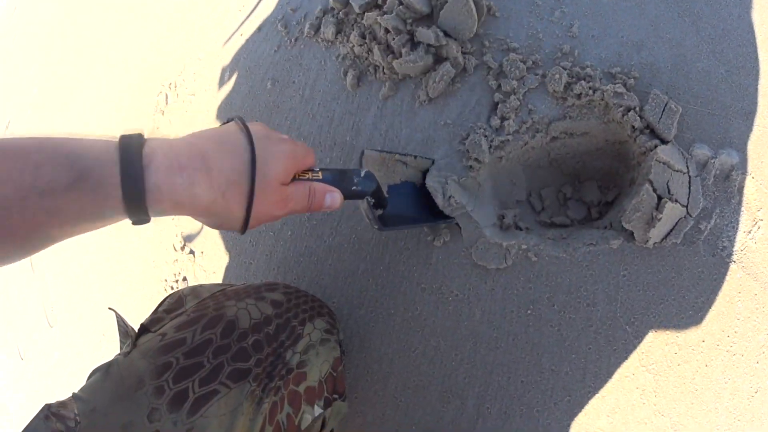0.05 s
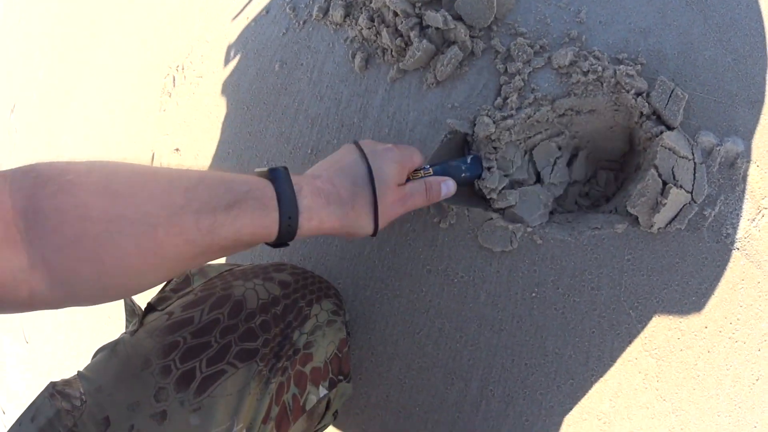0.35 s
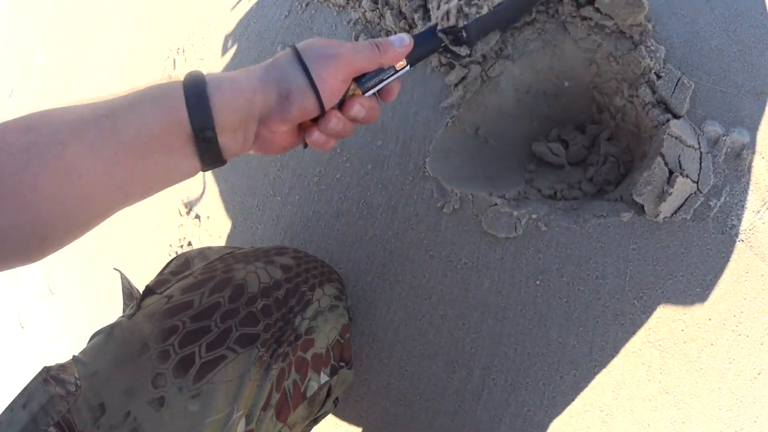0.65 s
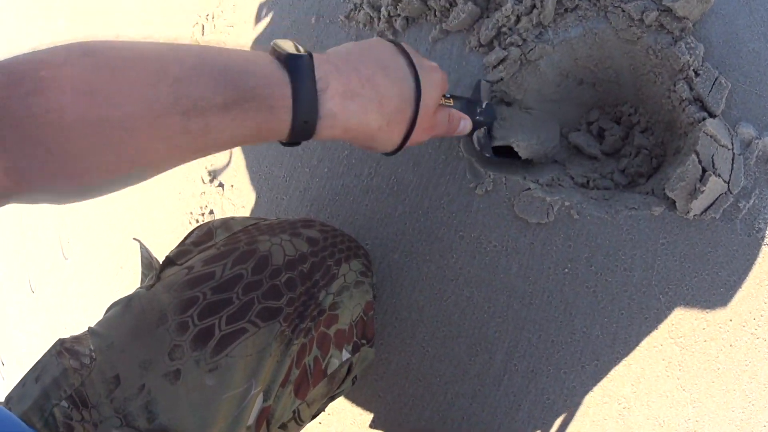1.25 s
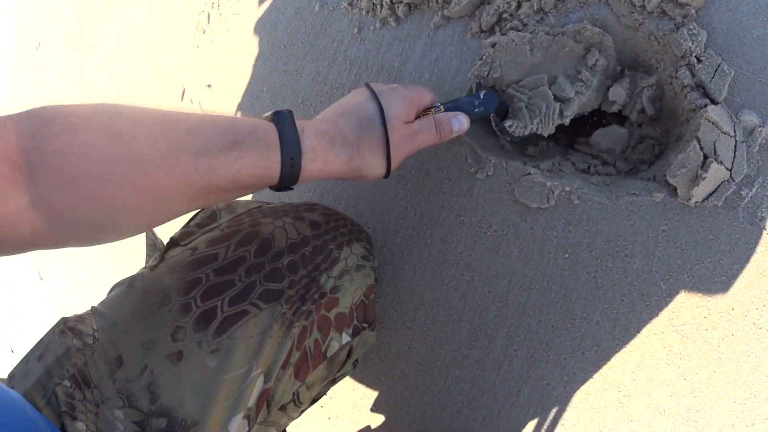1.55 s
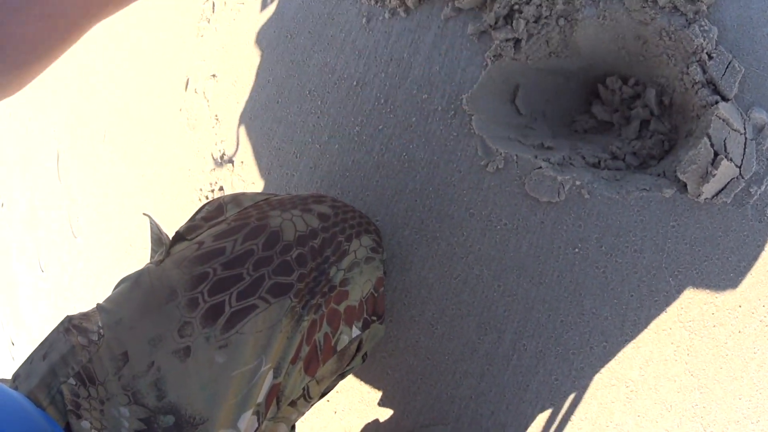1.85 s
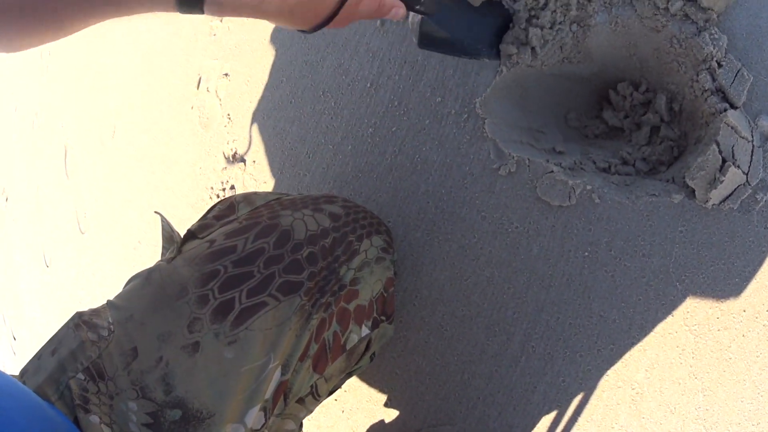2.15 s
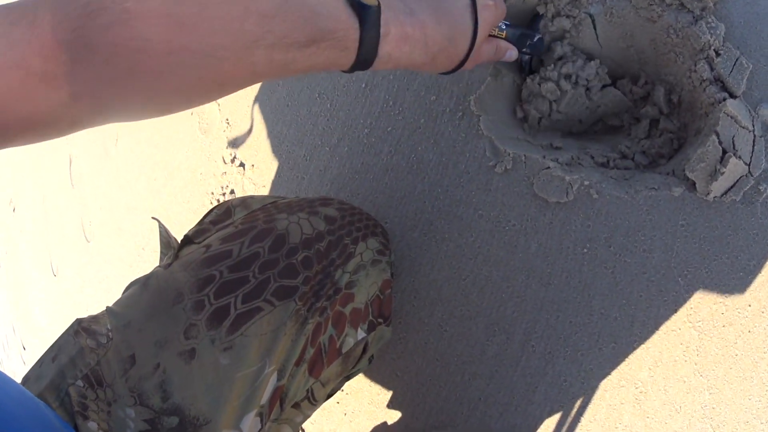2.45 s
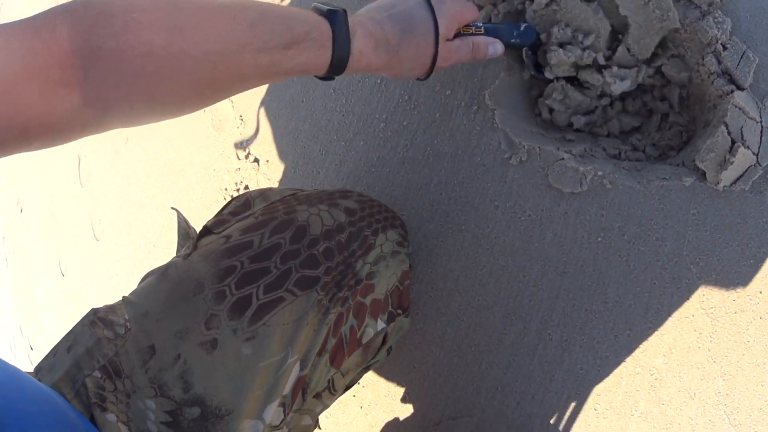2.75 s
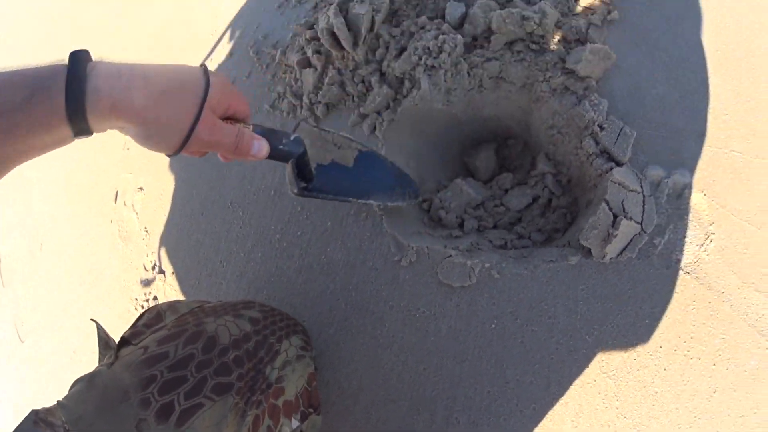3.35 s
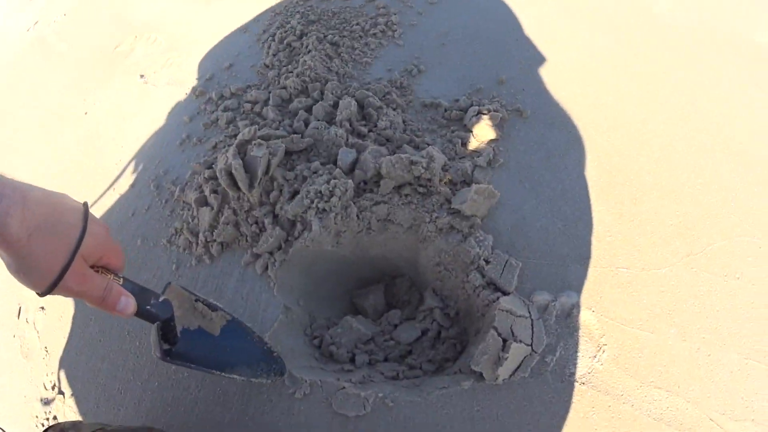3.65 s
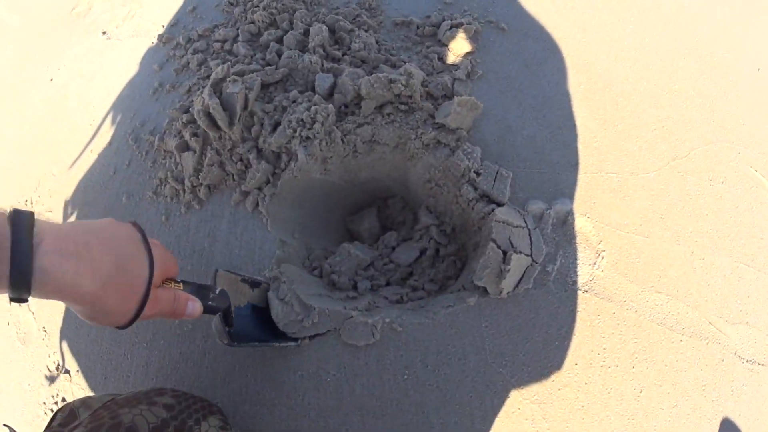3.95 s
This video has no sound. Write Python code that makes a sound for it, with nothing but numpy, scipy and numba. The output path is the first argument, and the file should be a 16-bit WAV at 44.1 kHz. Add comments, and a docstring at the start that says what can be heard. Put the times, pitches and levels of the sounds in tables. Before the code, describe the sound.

Gritty, hissing trowel strokes dig into damp beach sand under gusts of rumbling wind.

```python
"""On a beach, a hand trowel cuts four times into damp sand: grains hiss and rasp along the blade.
Between strokes, loose sand spills and the blade ticks on grit and rings faintly.
Wind buffets the two microphone ports in short puffs, brighter the harder it blows, over faint surf.
A limiter ducks everything under the hardest puffs."""
import sys
import numpy as np
from scipy import signal
from scipy.fft import rfft, irfft
from scipy.io import wavfile
from scipy.ndimage import uniform_filter1d, map_coordinates
from numba import njit

SR = 44100
rng = np.random.default_rng(int(sys.argv[2]) if len(sys.argv) > 2 else 0)


def output_pcm(signal):
    """Save a mono or channel-first signal as 16-bit PCM at the path in sys.argv[1].

    Samples are clipped to [-1, 1] before scaling.
    """
    pcm = np.clip(np.atleast_2d(signal).T, -1, 1) * 32767
    wavfile.write(sys.argv[1], SR, np.round(pcm).astype(np.int16))


N = 176400
T = np.arange(N) / SR

# One list per trowel stroke. Each row: time in seconds, relative hiss and rasp levels in dB.
STROKES = [
    [(.008, -43, -54), (.045, -37.5, -47.5), (.09, -26, -37), (.18, -30.5, -33.5), (.21, -34, -38.5),
     (.285, -40.5, -44.5), (.33, -61, -59)],
    [(1.01, -49, -48), (1.085, -44.5, -55), (1.16, -31, -40.5), (1.235, -23.5, -28), (1.265, -28, -32.5),
     (1.308, -26, -30), (1.323, -37, -39), (1.38, -40, -36.5), (1.445, -54.5, -50)],
    [(2.157, -41.5, -41), (2.19, -35.5, -41), (2.25, -28.5, -29), (2.375, -24, -31), (2.405, -38, -37),
     (2.465, -46, -43), (2.49, -57.5, -55)],
    [(3.857, -33, -39), (3.92, -33.5, -42), (3.97, -33, -36.5), (4.0, -35, -33.5)],
]
# Sand spectra: fine sliding, coarse sliding, loose. Each row: frequency in Hz, relative density in dB.
HISS_SPECTRUM = [(4500, -41), (7000, -13), (8200, -2), (9000, -2.5), (10000, 2), (11000, -4), (11900, -10),
                 (13400, 1), (15800, -3)]
RASP_SPECTRUM = [(1000, -8), (1600, 3.5), (3300, 7), (4300, 2), (6800, -0.5), (9000, 1.5), (16000, -8.5)]
LOOSE_SPECTRUM = [(500, -33), (1400, -3), (3200, 6.5), (4500, 4), (6800, -0.5), (9600, 7), (12000, -4),
                  (14000, 3), (15800, -6)]
# Blade modes under the rasp. Each row: frequency in Hz, relative level in dB.
BLADE_MODES = [(3040, -16.5), (3540, -9.5), (4520, -17.5), (5500, -15.5), (7900, -18.5)]
# Blade brushing sand. Each row: start in seconds, length in seconds, pitch in Hz, level in dB.
RINGS = [(0.997, .13, 5150, -48.5), (2.036, .26, 3553, -61), (3.5, 0.085, 4370, -48.5)]
# Sand spills. Each row: start in seconds, length in seconds, level in dB.
SPILLS = [(0.363, 0.18, -55.5), (0.565, 0.065, -41.5), (0.631, 0.04, -52), (1.466, 0.074, -46.5),
          (1.544, 0.11, -49), (2.042, 0.057, -50), (2.721, 0.058, -45), (2.814, 0.086, -44.5),
          (2.955, 0.12, -51), (3, 0.066, -49), (3.479, 0.093, -47), (3.61, 0.075, -53.5)]
# Blade on grit. Each row: start in seconds, level in dB, decay in seconds.
TICKS = [(1.005, -32, 0.0054), (3.315, -31, .002), (3.49, -29.5, 0.0023)]
# Wind puffs. Each row: start in seconds, length in seconds, strength in dB.
PUFFS = [(0.0, 0.0086, -7.5), (0.027, 0.0091, -14.0), (0.073, 0.042, -16.0), (0.108, 0.023, -8.5),
         (0.151, 0.043, -8.5), (0.194, 0.016, -8), (0.208, 0.042, -16.5), (0.255, 0.0099, -9),
         (0.313, 0.012, -19), (0.326, 0.0059, -6), (0.368, 0.019, -20), (0.398, 0.013, -20.5),
         (0.439, 0.019, -19.0), (0.507, 0.012, -15.5), (0.564, 0.0092, -20), (0.602, 0.033, -21.5),
         (0.815, 0.022, -20), (0.985, 0.0073, -13), (1.012, 0.017, -7.5), (1.038, 0.012, -8.5),
         (1.065, 0.02, -14), (1.147, 0.0095, -15.5), (1.192, 0.028, -20.0), (1.238, 0.026, -7.0),
         (1.274, 0.014, -13.0), (1.316, 0.037, -8.0), (1.363, 0.012, -15.0), (1.386, 0.023, -6.5),
         (1.411, 0.019, -16.5), (1.434, 0.037, -7), (1.467, 0.026, -11), (1.492, 0.018, -19.0),
         (1.508, 0.034, -13.0), (1.542, 0.019, -6), (1.603, 0.018, -11.5), (1.648, 0.011, -15.0),
         (1.681, 0.03, -9.5), (1.72, 0.026, -13.0), (1.78, 0.027, -8.5), (1.802, 0.035, -17.0),
         (1.849, 0.0093, -12.5), (1.891, 0.021, -12.5), (1.922, 0.015, -13.5), (1.937, 0.018, -2.0),
         (1.953, 0.026, -13.0), (2.048, 0.022, -19.5), (2.096, 0.012, -7.5), (2.108, 0.016, -14),
         (2.152, 0.023, -12.5), (2.26, 0.061, -14.0), (2.348, 0.035, -15.0), (2.392, 0.0098, -11.0),
         (2.44, 0.006, -11.5), (2.454, 0.037, -16), (2.548, 0.023, -17.0), (2.621, 0.056, -18),
         (2.684, 0.044, -10.5), (2.743, 0.058, -12), (2.804, 0.011, -9), (2.813, 0.016, -16.0),
         (2.836, 0.042, -11), (2.873, 0.037, -15.0), (2.928, 0.035, -14.0), (3.021, 0.027, -18),
         (3.123, 0.0081, -16.0), (3.142, 0.029, -18.5), (3.17, 0.016, -14), (3.225, 0.03, -18.5),
         (3.264, 0.017, -17.0), (3.298, 0.012, -14.5), (3.413, 0.025, -20.0), (3.495, 0.0091, -14.5),
         (3.7, 0.0084, -15.5), (3.749, 0.014, -7.5), (3.765, 0.029, -11.5), (3.813, 0.0076, -9),
         (3.83, 0.041, -10.5), (3.878, 0.092, -10.5), (3.971, 0.03, -19), (3.986, 0.011, -10.5)]
# Breeze between puffs. Each row: time in seconds, strength in dB.
BREEZE = [(0, -27), (.62, -30.5), (.68, -42), (.92, -41), (1.02, -27), (1.8, -25.5), (1.87, -35.5),
          (2.02, -35), (2.25, -26), (2.58, -33), (2.9, -25), (2.99, -36.5), (3.2, -25), (3.35, -25.5),
          (3.39, -37), (3.57, -38), (3.66, -49), (3.75, -25), (4.0, -24.5)]
# Spectra: eddies at WIND_REF_DB, wind rumble, surf. Each row: frequency in Hz, relative density in dB.
EDDY_SPECTRUM = [(30, -12), (80, -2.5), (150, 0.5), (260, -1), (420, -5), (600, -7), (850, -13.5),
                 (1200, -21.5), (1800, -37.5), (5000, -63)]
RUMBLE_SPECTRUM = [(15, -19), (30, -26), (55, 2.5), (190, 3.5), (600, -2.5), (2000, -46.5)]
SURF_SPECTRUM = [(300, -2.5), (600, -12), (1000, -7.5), (3200, -15.5), (7000, -26.5), (9800, -26),
                 (12000, -37), (16000, -34)]
# The background hiss ducks briefly under hard gusts; the second row is negligible.
# Each row: start in seconds, length in seconds, gain in dB.
BACKGROUND_DUCKS = [(1.68, 0.412, -5.5), (3.752, 0.14, 0.5)]

WIND_REF_DB, WIND_DB_PER_OCTAVE = -17, 12
SINK_START_HZ, SINK_HZ_PER_S, SINK_WIDTH_HZ, SINK_DB = 8320, 7300, 1800.0, -5


def trowel(hiss_db=1.5, rasp_db=6.5, judder_db=0.5):
    """Grains rub along the juddering blade: fine hiss and coarse, hollow rasp."""
    fine, coarse, sunk_s = np.zeros((3, N))
    for stroke in STROKES:
        time_s, fine_db, coarse_db = np.array(stroke).T
        inside = (T >= time_s[0]) & (T <= time_s[-1])
        fine += inside * undb(np.interp(T, time_s, fine_db))
        coarse += inside * undb(np.interp(T, time_s, coarse_db))
        sunk_s += inside * (T - time_s[0])
    hiss = pan(spread(lambda: sinking_hiss(sunk_s), width=0.35), left_db=2.0)
    rasp = spread(lambda: colour(grains(), RASP_SPECTRUM) + blade(), width=0.089)
    judder = undb(judder_db * walk(rate_hz=93))
    return judder * (undb(hiss_db) * fine * hiss + undb(rasp_db) * coarse * rasp)


def sinking_hiss(sunk_s):
    """Fine grains, with a resonance that climbs as the blade sinks in."""
    centre_hz = np.clip(SINK_START_HZ + SINK_HZ_PER_S * sunk_s, 100, SR / 4)
    hiss = colour(grains(), HISS_SPECTRUM)
    return hiss + undb(SINK_DB) * unit(resonance(grains(), centre_hz, SINK_WIDTH_HZ))


def grains(rate_per_s=10000, spread_db=4.5, max_db=15.5):
    """Dense clicks of sand grains, a few much larger than the rest."""
    size_db = np.minimum(spread_db * rng.exponential(size=N), max_db)
    return (rng.random(N) < rate_per_s / SR) * np.sign(noise()) * undb(size_db)


def blade_mode(hz, width_hz=170.0):
    """Grains excite one damped mode of the blade."""
    return unit(resonance(grains(), np.full(N, float(hz)), width_hz))


def blade():
    """Grains keep several blade modes sounding."""
    return sum(undb(db) * blade_mode(hz) for hz, db in BLADE_MODES)


def rings():
    """The blade rings faintly where it brushes the sand."""
    return sum(undb(db) * arch(start_s, length_s) * blade_mode(hz) for start_s, length_s, hz, db in RINGS)


def spills(soften_s=0.013, uneven_db=2.5):
    """Loose sand slides off the blade and lands in uneven swells."""
    swells = sum(undb(db) * arch(start_s, length_s) for start_s, length_s, db in SPILLS)
    flow = smooth(swells, soften_s) * undb(uneven_db * walk(rate_hz=84))
    return flow * spread(lambda: colour(grains(), LOOSE_SPECTRUM), width=0.44)


def ticks(rise_s=0.00067):
    """Short crunches where the blade meets grit."""
    crunch = sum(undb(db) * (T >= start_s) * np.exp(-np.abs(T - start_s) / decay_s)
                 for start_s, db, decay_s in TICKS)
    return smooth(crunch, rise_s) * spread(lambda: colour(grains(), LOOSE_SPECTRUM), width=0.79)


def wind(local_band_hz=(137, 675), local_db=-0.5, rumble_db=-29):
    """Eddies cross the right port, then the left; mid-sized ones also hit one only. Rumble beneath."""
    force = wind_force()
    eddies = turbulence()
    crossing = np.array([sweep(trailing(eddies), force), sweep(eddies, force)])
    band = signal.butter(2, local_band_hz, "band", fs=SR, output="sos")
    local = signal.sosfilt(band, [sweep(turbulence(), force) for port in range(2)])
    swell = smooth(force, 0.06) / undb(WIND_REF_DB)
    rumble = swell * spread(lambda: colour(noise(), RUMBLE_SPECTRUM), width=0.25)
    return crossing + undb(local_db) * local + undb(rumble_db) * rumble


def wind_force(trim_db=-0.18, edge_s=0.0015, puff_flicker_db=1.0, breeze_flicker_db=3.5):
    """Puffs ride on the breeze; both flicker."""
    puffs = sum(undb(db + trim_db) * arch(start_s, length_s, 0.3) for start_s, length_s, db in PUFFS)
    breeze = undb(np.interp(T, *np.array(BREEZE).T) + breeze_flicker_db * walk(rate_hz=60))
    puffs = smooth(puffs, edge_s) * undb(puff_flicker_db * walk(rate_hz=190))
    return np.hypot(puffs, breeze)


def turbulence(even_s=0.0066):
    """A long field of eddies of even strength."""
    field = colour(rng.standard_normal(2 * N), EDDY_SPECTRUM)
    return field / np.sqrt(smooth(field ** 2, even_s))


def sweep(field, force):
    """Air carries eddies past a port: faster is louder and higher."""
    octaves = (20 * np.log10(force) - WIND_REF_DB) / WIND_DB_PER_OCTAVE
    travel = np.cumsum(2 ** octaves)
    return force * map_coordinates(field, [travel], order=3, mode="wrap")


def trailing(field, max_lag_rad=2.126, knee_hz=444):
    """The same eddies at the far port: smaller ones lag more in phase, up to a limit."""
    hz = np.fft.rfftfreq(len(field), 1 / SR)
    lag_rad = max_lag_rad * np.tanh((hz / knee_hz) ** 2)
    return irfft(rfft(field) * np.exp(-1j * lag_rad), len(field))


def surf(level_db=-44.5):
    """Distant, even wash; this background hiss ducks briefly at a set time."""
    duck_db = sum(db * arch(start_s, length_s, 0.3) for start_s, length_s, db in BACKGROUND_DUCKS)
    return undb(level_db + duck_db) * spread(lambda: colour(noise(), SURF_SPECTRUM), width=0.7)


def undb(db):
    return 10 ** (np.asarray(db) / 20)


def unit(x):
    return x / np.sqrt(np.mean(x ** 2))


def noise():
    return rng.standard_normal(N)


def colour(x, spectrum):
    """Filter x by (Hz, dB) points; rms 1."""
    hz, db = np.array(spectrum).T
    bins_hz = np.maximum(np.fft.rfftfreq(len(x), 1 / SR), 1)
    gain = undb(np.interp(np.log(bins_hz), np.log(hz), db))
    return unit(irfft(rfft(x) * gain, len(x)))


def smooth(x, window_s):
    size = max(int(window_s * SR), 1)
    return uniform_filter1d(uniform_filter1d(x, size), size)


def walk(rate_hz):
    """Random levels, held and slewed; rms 1."""
    hold = int(SR / rate_hz)
    steps = np.repeat(noise()[:N // hold + 1], hold)[:N]
    return unit(smooth(steps, 1 / rate_hz))


def arch(start_s, length_s, roundness=0.23):
    """Rise and fall; lower roundness is flatter."""
    progress = np.clip((T - start_s) / length_s, 0, 1)
    return (1 - (2 * progress - 1) ** 2) ** roundness


def spread(make, width):
    """Stereo from a mid and a weaker, unrelated side."""
    return make() + width * make() * np.array([[1], [-1]])


def pan(x, left_db):
    return x * undb(np.array([[left_db], [-left_db]]) / 2)


@njit
def resonance(x, centre_hz, width_hz):
    """State-variable band-pass with a moving centre."""
    y, band_state, low_state = np.empty(len(x)), 0., 0.
    for i in range(len(x)):
        tuning, damping = np.tan(np.pi * centre_hz[i] / SR), width_hz / centre_hz[i]
        band = (band_state + tuning * (x[i] - low_state)) / (1 + tuning * (tuning + damping))
        band_state = 2 * band - band_state
        low_state += 2 * tuning * band
        y[i] = damping * band
    return y


@njit
def follow(x, attack_s, release_s):
    """Envelope follower."""
    y, level = np.empty(len(x)), 0.
    for i in range(len(x)):
        level += (x[i] - level) / (SR * (attack_s if x[i] > level else release_s))
        y[i] = level
    return y


def scene():
    return wind() + trowel() + rings() + spills() + ticks() + surf()


def record(dry, threshold_db=-16, ratio=2.006):
    """One limiter for both channels, microphone treble droop, steep top cut."""
    peak = follow(np.abs(dry).max(axis=0), attack_s=0.000067, release_s=0.012)
    gain = np.maximum(peak / undb(threshold_db), 1) ** (1 / ratio - 1)
    droop = signal.butter(4, 15000, fs=SR, output="sos")
    top_cut = signal.ellip(12, .1, 80, 15700, fs=SR, output="sos")
    return signal.sosfilt(np.vstack([droop, top_cut]), dry * smooth(gain, 0.0003))


dry = scene()
out = record(dry)
output_pcm(out)
```